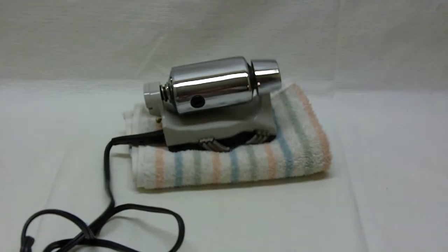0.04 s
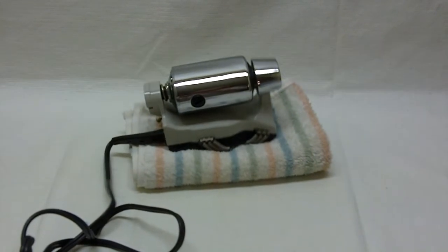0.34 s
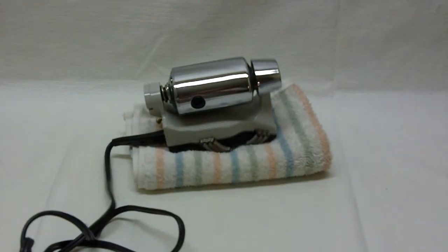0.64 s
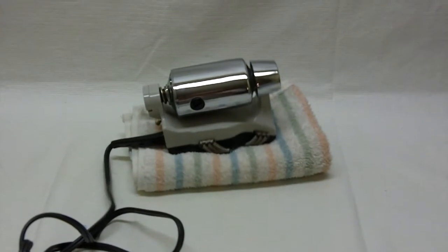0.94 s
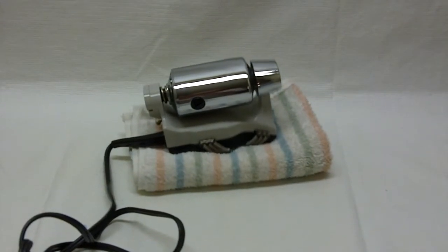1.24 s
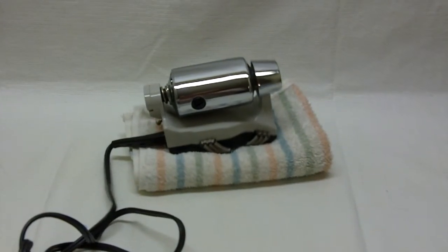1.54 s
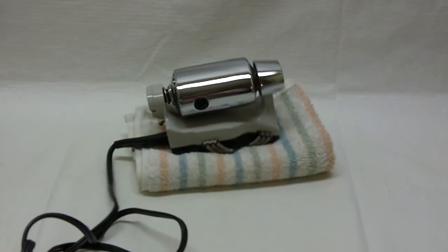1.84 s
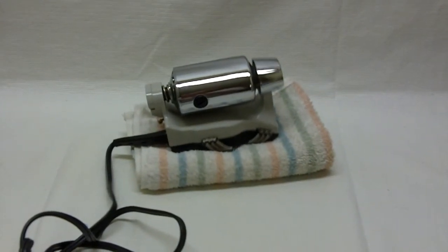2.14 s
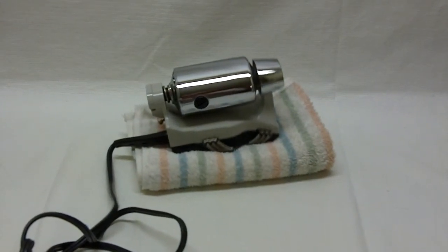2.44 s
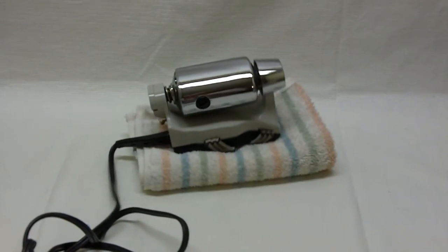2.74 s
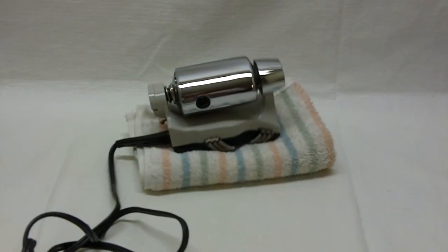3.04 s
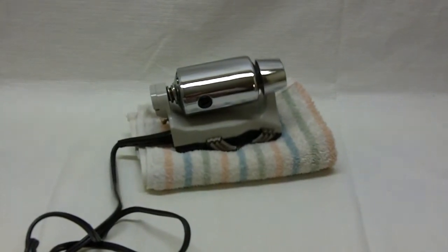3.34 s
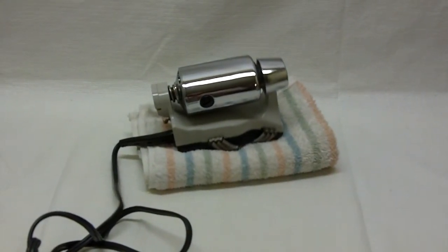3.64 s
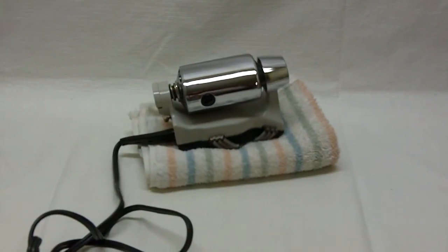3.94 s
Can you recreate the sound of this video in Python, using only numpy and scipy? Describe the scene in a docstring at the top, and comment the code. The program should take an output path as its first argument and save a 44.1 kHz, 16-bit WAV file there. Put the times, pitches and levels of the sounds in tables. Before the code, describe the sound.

A small electric massager runs on a folded towel, its low buzz topped by a fast metallic clatter that throbs evenly. It keeps the same speed throughout, close to the microphone in a small, quiet room.

```python
"""A throbbing metallic clatter over a low buzz: a small electric massager running on a folded towel,
close to a mono microphone in a small room. Its off-centre weight shakes it 46 times a second,
and in every turn loose parts knock the housing and rattle. The pull of the mains drifts in and
out of step with the shaft, so the clatter throbs 14 times a second."""
import sys
import numpy as np
from scipy import signal
from scipy.fft import rfft, irfft, next_fast_len
from scipy.io import wavfile
from scipy.ndimage import map_coordinates

SR = 44100
rng = np.random.default_rng(int(sys.argv[2]) if len(sys.argv) > 2 else 0)


def dump_mix(stems):
    """Bounce the given channels to the path in sys.argv[1] as a 16-bit WAV at rate SR."""
    frames = np.atleast_2d(stems).T  # one column per channel
    limited = np.clip(frames, -1, 1)  # hard clip at full scale
    pcm = np.round(limited * 32767).astype(np.int16)
    wavfile.write(sys.argv[1], SR, pcm)


N = 176400
TIME = np.arange(N) / SR
MAINS_HZ = 60


def amp(db):
    """Decibels to gain."""
    return 10 ** (np.asarray(db) / 20)


def unit(x):
    """Scale to rms 1."""
    return x / np.sqrt(np.mean(x ** 2) + 1e-20)


def curve(rows):
    """Join (seconds, value) points with straight lines, one value a sample."""
    return np.interp(TIME, *np.transpose(rows))


def wobble(knots_per_s):
    """A smooth random curve."""
    return map_coordinates(rng.standard_normal(400), [TIME * knots_per_s], mode="mirror")


def filtered(x, response):
    """Filter x by a complex response, a function of Hz."""
    size = 2 * next_fast_len(N // 2 + 8192)
    return irfft(rfft(x, size) * response(np.fft.rfftfreq(size, 1 / SR)), size)[:N]


def coloured(x, points):
    """Pass x through a causal filter of (Hz, dB) points and scale it to rms 1."""
    def response(hz):
        point_hz, db = np.transpose(points)
        cepstrum = irfft(np.log(amp(np.interp(np.log(hz + 1), np.log(point_hz), db))))
        return np.exp(rfft(2 * cepstrum[:len(cepstrum) // 2], len(cepstrum)) - cepstrum[0])
    return unit(filtered(x, response))


def blows(turn, angle, sway_db, hardest, scatter_db, jitter_s, shift_s=0):
    """One impulse a turn; the mains-shaft beat sways its strength and, by shift_s, its timing."""
    turns = np.arange(190) + angle
    chance = rng.standard_normal((len(turns), 2))
    due_s = np.interp(turns, turn, TIME, left=-1, right=-1)
    beat = 2 * np.pi * (MAINS_HZ * due_s - turns - hardest)
    strength = amp(sway_db * np.cos(beat) + scatter_db * chance[:, 0])
    at = np.round((due_s - shift_s * np.sin(beat) + jitter_s * chance[:, 1]) * SR).astype(int)
    inside = (at >= 0) & (at < N)
    return np.bincount(at[inside], strength[inside], N)


# Low rumble of the massager's body, between its shaft harmonics. Each row: frequency in Hz, relative level in
# dB.
RUMBLE_SPECTRUM = [(10, -2), (35, 0), (70, -9), (150, -17), (330, -16), (500, -24), (3000, -60)]

def body_rumble():
    """A faint, steady low rumble comes from the shaking body."""
    return amp(-49) * coloured(rng.standard_normal(N), RUMBLE_SPECTRUM)


def room_reflections(x, level_db=-14, t60_s=.16):
    """The near walls answer briefly, and weakly with the microphone so close to the source."""
    t = np.arange(SR // 4) / SR
    tail = rng.standard_normal(len(t)) * 1000 ** (-t / t60_s) * (t > .003)
    return amp(level_db) * signal.fftconvolve(x, tail / np.linalg.norm(tail))[:N]


# Brushes and bearings, heard from close by. Each row: frequency in Hz, relative level in dB.
RUB_SPECTRUM = [(150, -33), (450, 2.5), (700, 10.5), (1100, 4.5), (1750, -1.5), (2700, 4.5), (4200, -3),
                (6500, 1), (8200, 3), (10000, -15.5), (12000, -19), (15000, -22)]

def rubbing(turn, sway_db=1.5, loudest_turn=.75):
    """Brushes and bearings rub with a hiss that swells once a turn."""
    pressure = amp(sway_db * np.cos(2 * np.pi * (turn - loudest_turn)))
    return amp(-39.5) * coloured(pressure * rng.standard_normal(N), RUB_SPECTRUM)


# The whole body shaking on the towel. Each row: multiple of the shaft speed, rms level in dB.
SHAKE_HARMONICS = [(1, -28), (2, -43), (3, -53), (4, -64.5), (5, -55), (6, -52), (7, -52.5), (8, -53),
                   (9, -65.5)]

def body_shake(turn, spread_turns=.018):
    """The off-centre weight swings the body; the higher harmonics make a thump once a turn."""
    (_, swing_db), *overtones = SHAKE_HARMONICS
    swing = amp(swing_db) * np.cos(2 * np.pi * turn)
    thump = sum(amp(db) * np.sin(2 * np.pi * k * (turn + spread_turns * rng.standard_normal()))
                for k, db in overtones)
    return np.sqrt(2) * (swing - thump)


# Tones from the motor inside. Each row: multiple of the shaft speed, multiple of the mains
# frequency added to it, rms level in dB halfway through.
HUM_TONES = [(0, 1, -50.5), (0, 2, -58.5), (1, 1, -53), (4, 1, -58), (6, 1, -61), (9, 1, -59), (10, 1, -59),
             (14, 1, -50), (13, 2, -49.5)]

def motor_hum(turn, swell_cycles=.58, rise_db_per_s=.8):
    """Mains hum mixes with the shaft's turning into sum tones, which slowly grow louder."""
    beat = MAINS_HZ * TIME - turn - swell_cycles  # neighbouring tones swell together on whole cycles
    shaft = turn + rng.random()
    hum = sum(amp(db) * np.cos(2 * np.pi * ((k + m) * shaft + m * beat)) for k, m, db in HUM_TONES)
    return np.sqrt(2) * amp(rise_db_per_s * (TIME - N / SR / 2)) * hum


# Knocks on the housing in one turn. Each row: shaft angle in turns, relative strength in dB.
KNOCKS_PER_TURN = [(.0, 0.5), (.25, -16), (0.438, -4.5), (0.552, 2), (.76, -8.5), (0.892, -5)]
# The drifting force of the knocks. Each row: time in seconds, gain in dB.
KNOCK_FORCE = [(0, -2.2), (1.2, -2.1), (1.5, -1), (2.6, -1.27), (4, -1.5)]
# Resonances of the housing. Each row: frequency in Hz, width in Hz, relative level in dB.
HOUSING_MODES = [(525.7, 178, -26.5), (623, 100, -11), (721.3, 21, -9), (853.7, 13.3, -6), (1024, 46, 3),
                 (1069, 42.6, 1.5), (1107.7, 33.5, -0.5), (1215, 37, -10.5), (1414, 27, -14.5),
                 (1535, 20, -14)]

def housing_knocks(turn):
    """Loose parts strike the hollow housing several times a turn and set it ringing."""
    def housing(f):
        return sum((-1) ** k * amp(db) * 1j * f * width / (hz * hz - f * f + 1j * f * width)
                   for k, (hz, width, db) in enumerate(HOUSING_MODES))
    hits = np.zeros(N)
    for angle, db in KNOCKS_PER_TURN:
        hits += amp(db) * blows(turn, angle, sway_db=6.5, hardest=.27, scatter_db=.8,
                                jitter_s=.00006, shift_s=.00016)
    return amp(-36.5 + curve(KNOCK_FORCE)) * unit(filtered(hits, housing))


# Metal contacts in one turn, close to the microphone. Each row: shaft angle in turns, relative
# clack, click and tick levels in dB, seconds for the chatter to fall 60 dB, sway with the beat
# in dB, point of the beat where it hits hardest in cycles.
METAL_CONTACTS = [(.0, -9.5, -8, -0.5, 0.021, 2.5, 0.82), (.2, -15, -2, 3, 0.0056, 3.5, 0.78),
                  (.44, -3.5, -5.5, -1, 0.013, 4, 0.2), (.495, 2, -3, -1.5, .012, 5.5, 0.19),
                  (.6, -6, -7, -3, 0.016, 2.5, 0.17), (.72, -6.5, -6, -3.5, 0.032, 2.5, 0.19),
                  (.905, -7, 1.5, -3.5, 0.013, 3, 0.69), (0.949, -13, -5, -7, 0.017, 1.5, .8)]
# The mid clack, bright click and high tick. Each row: frequency in Hz, relative level in dB.
CLACK_SPECTRUM = [(600, -17), (1400, 3), (1740, -10.5), (2060, 4), (2260, -10.5), (2620, 3), (3000, -5.5),
                  (3600, -7), (5000, -8), (15000, -53)]
CLICK_SPECTRUM = [(1500, -22), (2800, -12), (3200, -2), (3900, 0.5), (4070, 4), (4500, 2), (5200, -13.5),
                  (7000, -2.5), (15000, -45)]
TICK_SPECTRUM = [(3000, -30.5), (5000, -32.5), (6000, -1), (6600, 5), (7100, -1.5), (8200, -3), (9600, -16),
                 (10300, -15), (11800, -26.5), (12700, -24.5), (15000, -67)]
# The slow rise and fall of the rattle. Each row: time in seconds, gain in dB.
RATTLE_GAIN = [(0, -0.2), (1.2, -1), (1.5, .6), (2.1, -0.5), (2.6, -0.5), (3.4, -2), (4, 0.5)]

def metal_rattle(turn):
    """Each metal contact is a hit and a brief chatter, with its own mix of clack, click and tick."""
    t = np.arange(SR // 30) / SR

    def layer(column, spectrum, level_db, hit_gain, rise_s, scatter_db):
        drive = np.zeros(N)
        for angle, *mix_db, chatter_s, sway_db, hardest in METAL_CONTACTS:
            hits = amp(mix_db[column]) * blows(turn, angle, sway_db, hardest, scatter_db, jitter_s=.00025)
            envelope = 1000 ** (-t / chatter_s) * (1 - np.exp(-t / rise_s))
            chatter = signal.oaconvolve(hits, envelope / envelope.max())[:N] * rng.standard_normal(N)
            drive += hit_gain * hits + chatter
        wander_db = .6 * wobble(knots_per_s=11)
        return amp(level_db + wander_db) * coloured(drive, spectrum)

    clack = layer(0, CLACK_SPECTRUM, level_db=-43, hit_gain=4, rise_s=.0001, scatter_db=.6)
    click = layer(1, CLICK_SPECTRUM, level_db=-40, hit_gain=2.5, rise_s=.0002, scatter_db=1.2)
    tick = layer(2, TICK_SPECTRUM, level_db=-36.5, hit_gain=2.5, rise_s=.0003, scatter_db=2.2)
    return amp(curve(RATTLE_GAIN)) * (clack + click + tick)


# The nearly steady shaft. Each row: time in seconds, speed in turns a second.
SHAFT_SPEED = [(0.0, 46.006), (0.31, 45.996), (0.62, 46.032), (0.92, 46.005), (1.23, 45.964),
               (1.54, 46.047), (1.85, 46.115), (2.15, 46.141), (2.46, 46.084), (2.77, 46.054),
               (3.08, 46.085), (3.38, 46.096), (3.69, 46.113), (4.0, 45.939)]

def scene():
    """The shaft angle drives every part of the massager; both channels are alike."""
    turn = .02 + np.cumsum(curve(SHAFT_SPEED)) / SR
    metal = metal_rattle(turn) + rubbing(turn)
    rumble = body_rumble()
    body = body_shake(turn) + motor_hum(turn) + housing_knocks(turn)
    return np.tile(rumble + room_reflections(metal) + body + metal, (2, 1))


def record(dry):
    """The close microphone has one deep notch, a band limit and a small steady offset."""
    notch_hz, width_hz, top_hz, offset = 5482, 840, 15050, .0208

    def microphone(f):
        notch = (notch_hz ** 2 - f * f) / (notch_hz ** 2 - f * f + 1j * f * width_hz)
        return notch * (f < top_hz)
    return np.array([filtered(channel, microphone) for channel in dry]) + offset


dry = scene()
out = record(dry)
dump_mix(out)
```